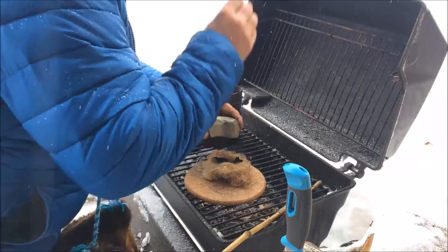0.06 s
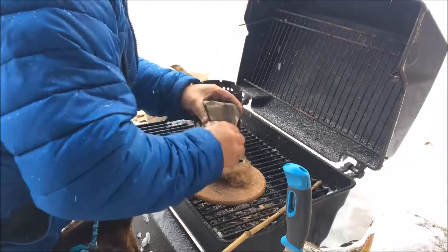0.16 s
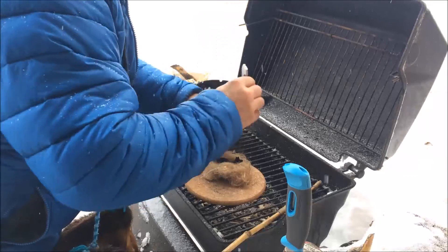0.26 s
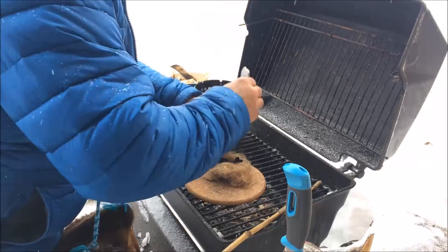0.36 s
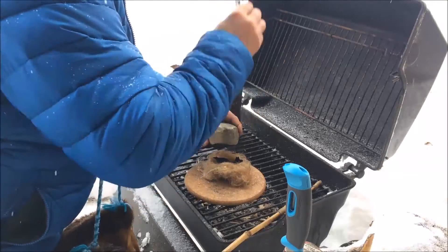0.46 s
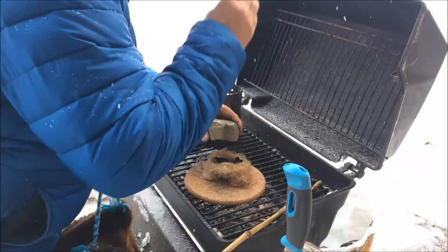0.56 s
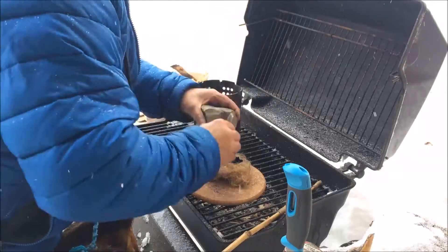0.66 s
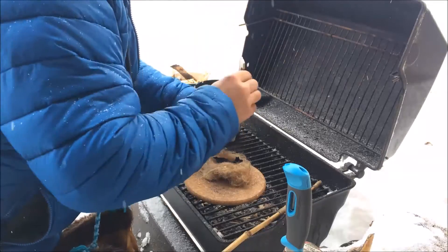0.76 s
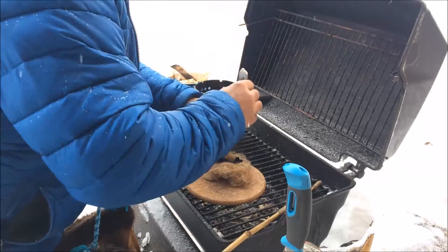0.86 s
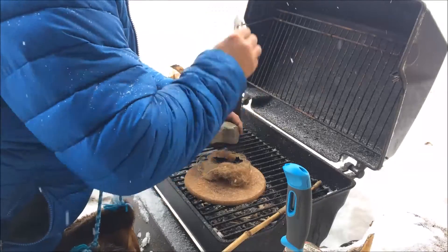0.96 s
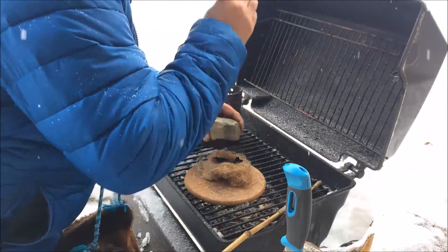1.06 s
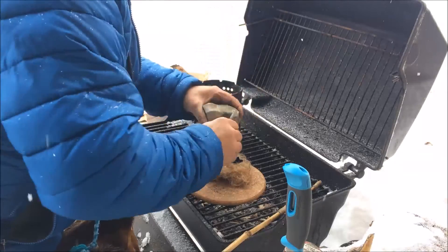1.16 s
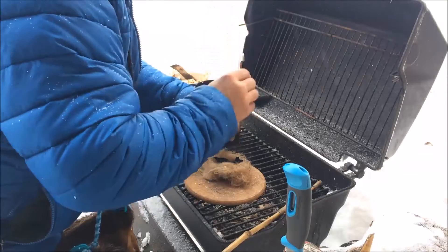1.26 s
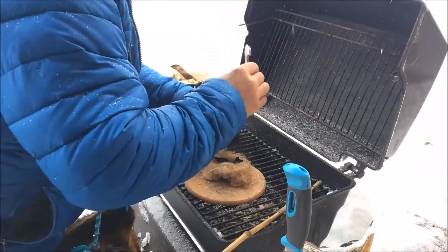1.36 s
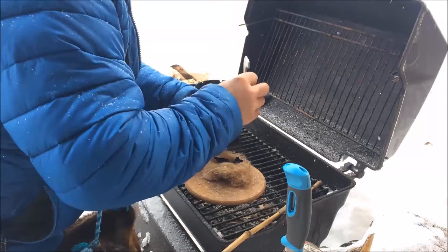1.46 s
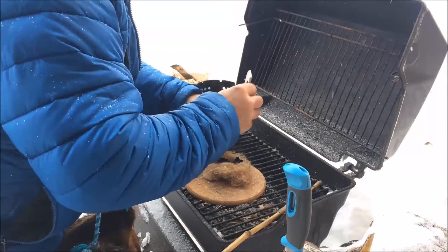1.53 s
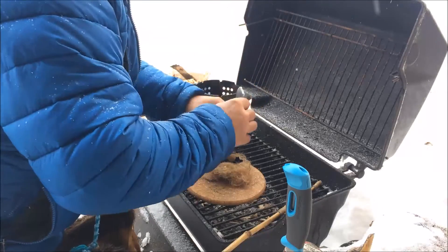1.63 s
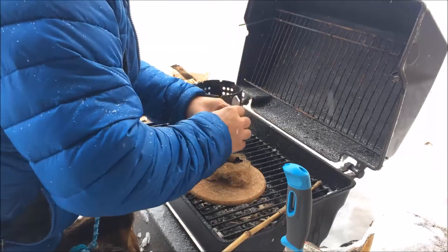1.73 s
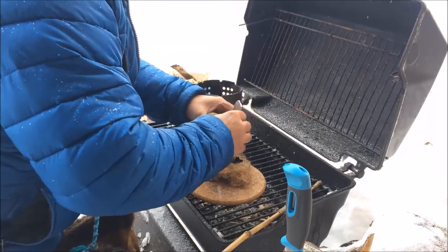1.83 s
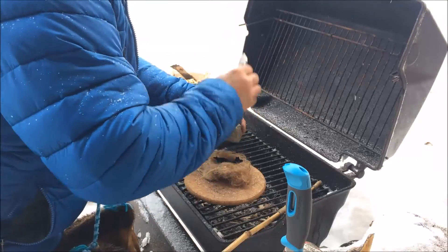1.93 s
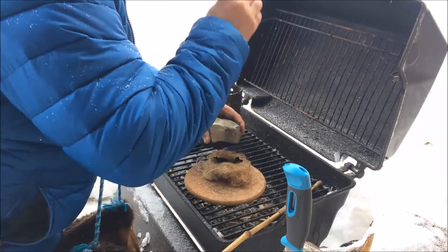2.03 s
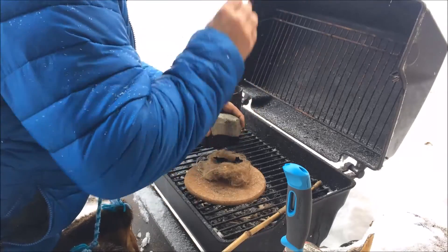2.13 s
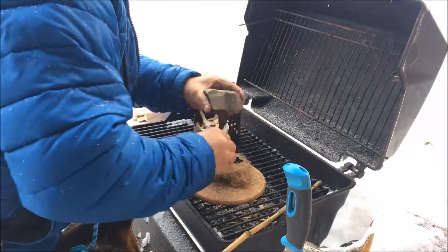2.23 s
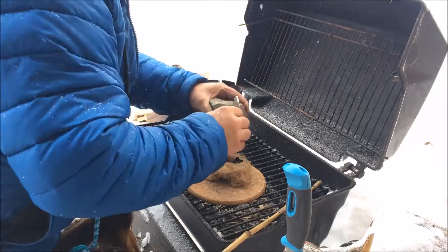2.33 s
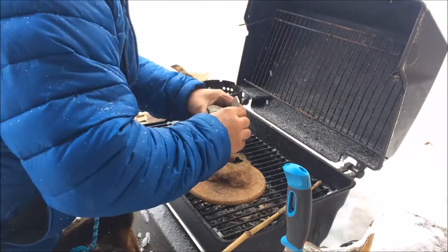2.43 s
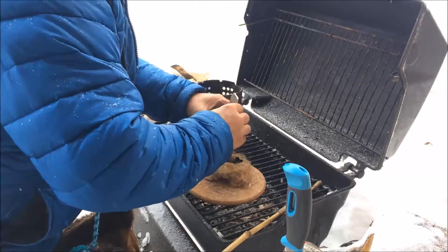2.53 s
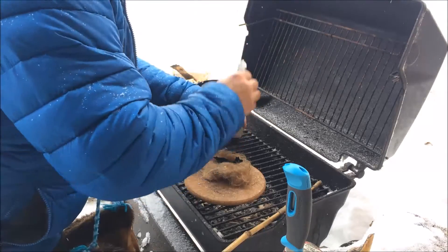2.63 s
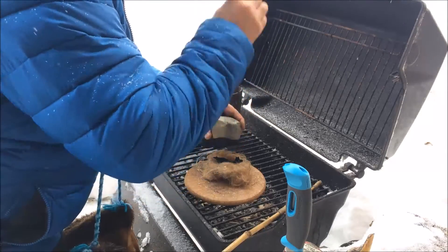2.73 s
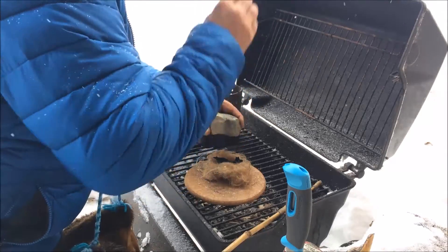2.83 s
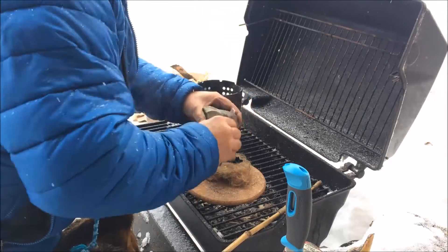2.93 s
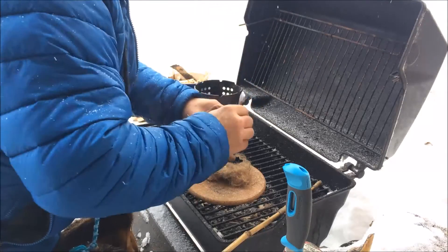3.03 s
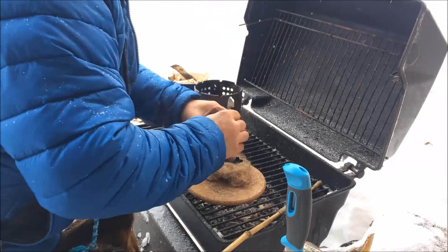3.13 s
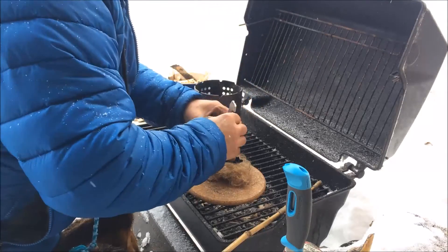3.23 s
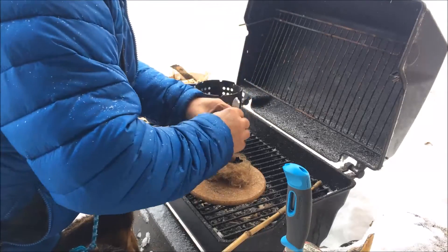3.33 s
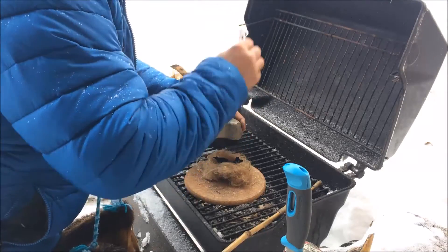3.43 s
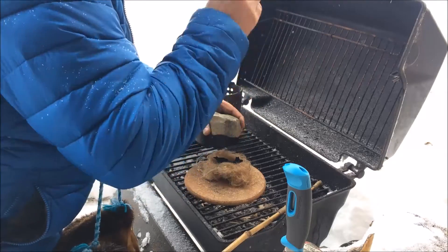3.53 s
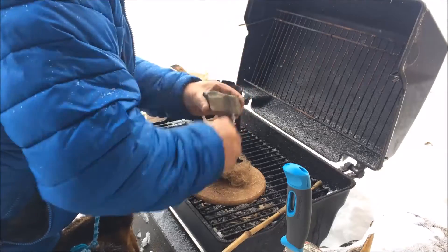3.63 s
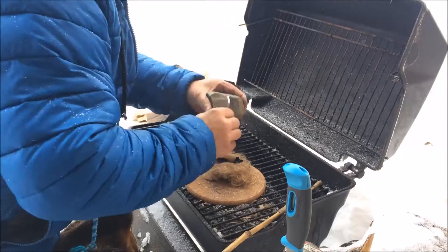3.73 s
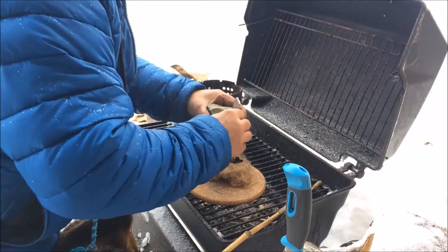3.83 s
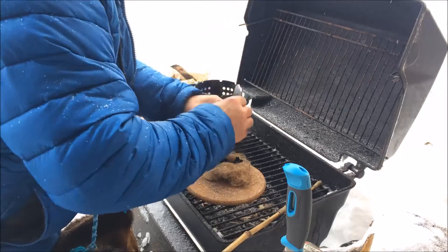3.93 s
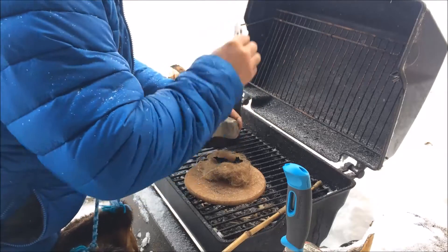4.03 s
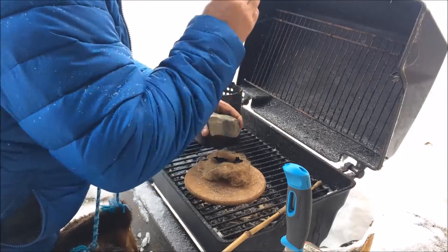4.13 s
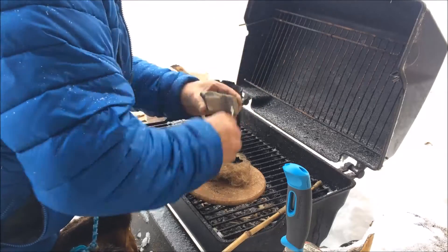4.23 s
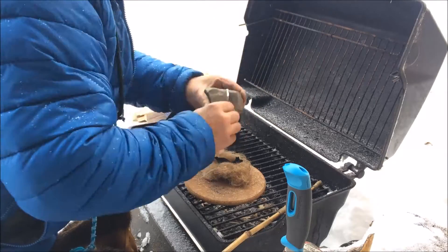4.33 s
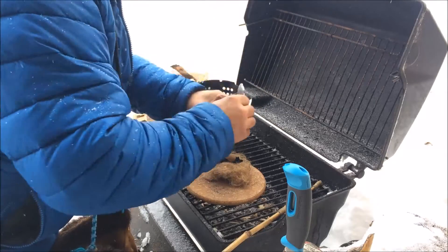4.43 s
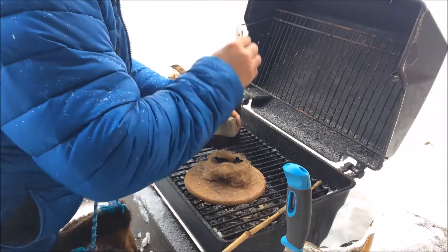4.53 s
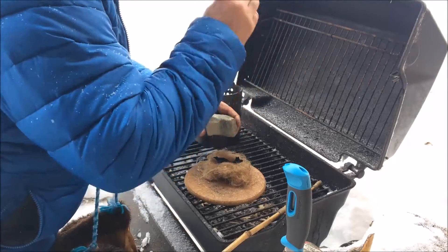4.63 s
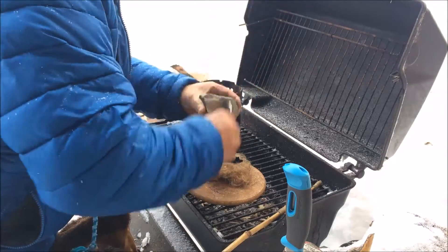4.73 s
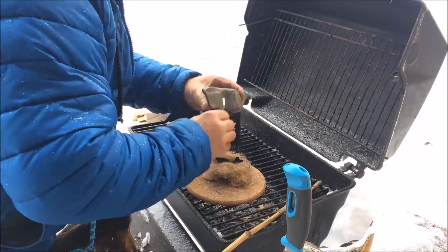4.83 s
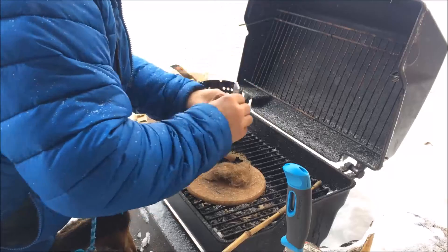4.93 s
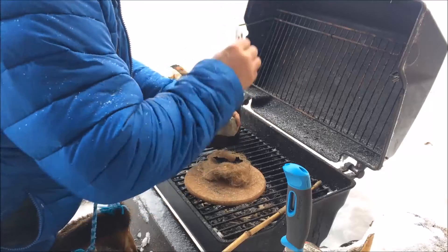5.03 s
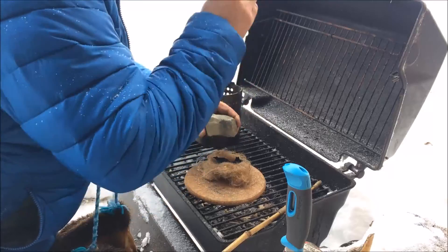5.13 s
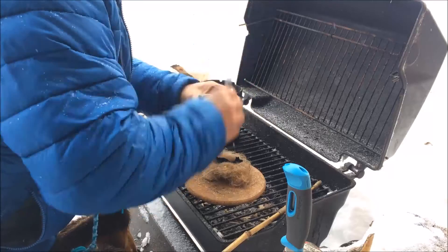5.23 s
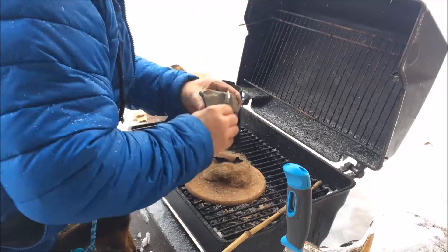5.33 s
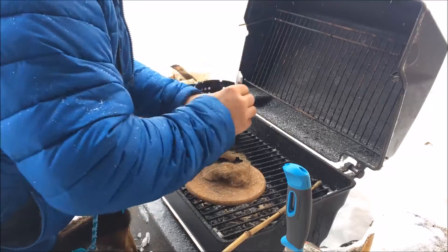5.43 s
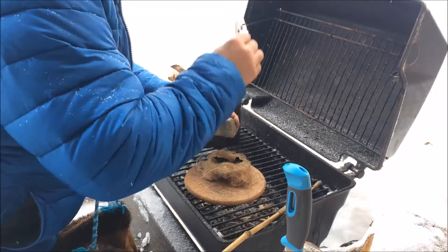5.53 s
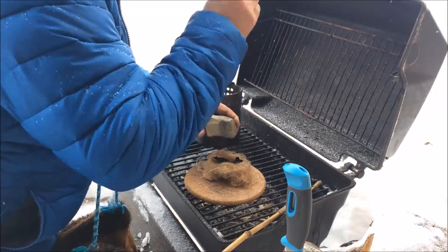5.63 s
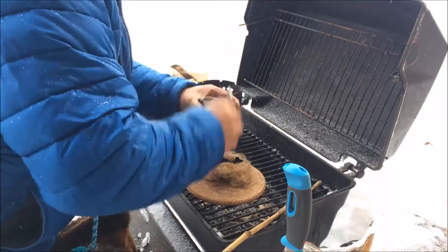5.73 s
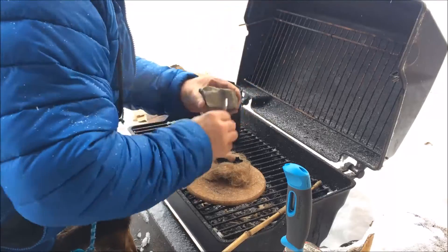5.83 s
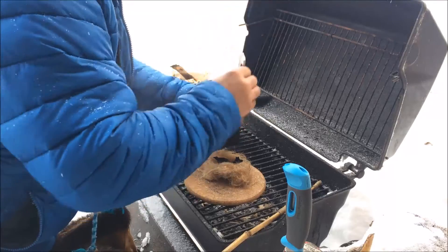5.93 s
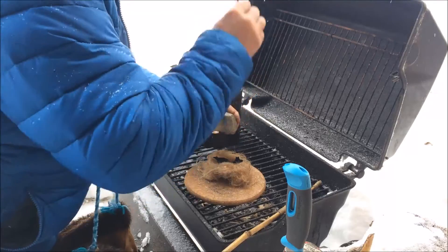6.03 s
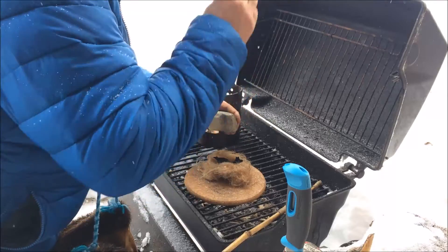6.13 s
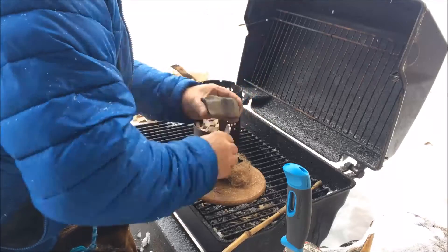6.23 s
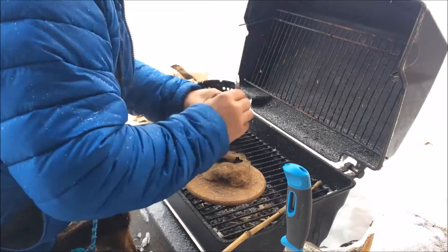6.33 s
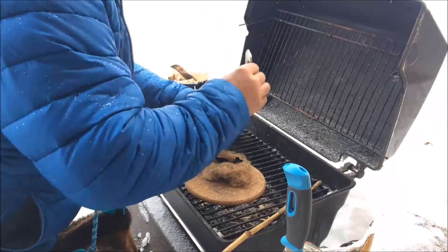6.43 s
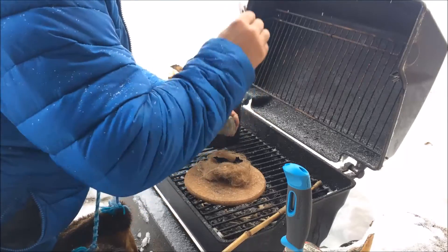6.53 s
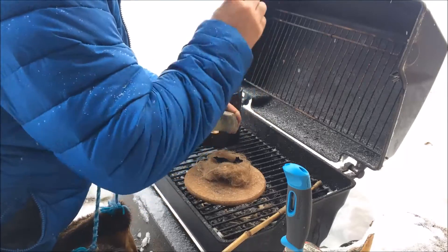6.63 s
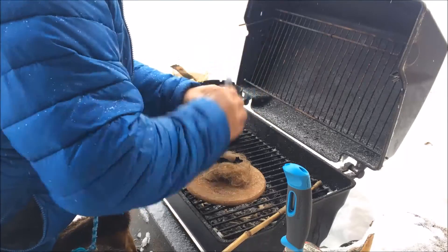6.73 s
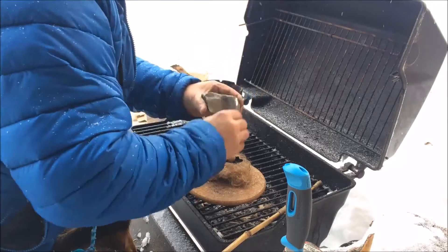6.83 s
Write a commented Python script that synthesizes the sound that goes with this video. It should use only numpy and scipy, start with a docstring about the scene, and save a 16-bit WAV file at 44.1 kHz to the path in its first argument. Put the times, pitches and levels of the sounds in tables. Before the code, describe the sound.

Sharp, scraping metallic clinks of steel struck repeatedly on flint, with soft sleeve swishes and a faint steady outdoor hum.

```python
"""Sharp, gritty clinks, about two a second: a steel striker swung against a hand-held flint.
Each blow cracks the stone, scrapes off chips and rings the gripped steel. An open grill adds its
hollow and lid echoes, the snowy yard a short tail. A padded sleeve swishes with the arm, the hands
bump the grill, and far engines hum over the still air."""
import sys
import numpy as np
from scipy import signal
from scipy.fft import rfft, irfft, next_fast_len
from scipy.io import wavfile
from scipy.ndimage import uniform_filter1d, minimum_filter1d, map_coordinates

SR = 44100
rng = np.random.default_rng(int(sys.argv[2]) if len(sys.argv) > 2 else 0)


def to_wav(s):
    """Save 16-bit WAV."""
    ch = np.atleast_2d(s).T  # columns
    pcm = np.round(np.clip(ch, -1, 1) * 32767)  # PCM
    wavfile.write(sys.argv[1], SR, pcm.astype(np.int16))


N = 302967
T = np.arange(SR // 3) / SR  # time within one blow

# steel meets flint: (time [s], strength [dB], relative thud level [dB], relative levels of bending
# modes 1, 2 and 3 [dB], pitch of mode 1 in this grip [Hz], scrape time constant [s])
STRIKES = [(0.237, -26.5, -33, 4.5, -7.5, 3, 4400, 0.0049), (0.7497, -25.5, -30, 2, -5.5, -3, 4420, 0.0032),
           (1.2554, -25, -21.5, -1, -10.5, -6.5, 4310, 0.0064),
           (1.2893, -41.5, -21.5, 10, -7.5, 6, 4270, 0.0011),
           (1.838, -49, -14, -15, -21, -11.5, 4360, 0.00023), (1.9271, -63, 3, -3, -5, -15, 4414, 0.001),
           (2.3024, -24, -15.5, -5, -6, -4, 4430, 0.0047), (2.6653, -64, -10, 0, 9, 1, 4675, .002),
           (3.0049, -25.5, -23.5, -1.5, -1, 3.5, 4355, 0.0025),
           (3.3827, -38.5, -13, 3, -16.5, -25, 4290, 0.001),
           (3.748, -27, -15.5, 3.5, 0.5, -7.5, 4400, 0.0039),
           (4.3482, -24.5, -17.5, 4.5, -11, -9, 4490, 0.0031),
           (4.853, -23.5, -15.5, 5, -8, -24.5, 4390, 0.0038), (5.359, -24, -24.5, 1.5, -9, 5, 4550, 0.0021),
           (5.8592, -25.5, -38.5, 6.5, -6.5, -10, 4545, .0036),
           (6.323, -26.5, -40, 2.5, -5.5, 5, 4590, 0.0027), (6.8625, -28, -25, 9.5, -22, 1, 4500, 0.0025)]
# steel damped by fingers and stone, one list per bending mode: (pitch [Hz], relative level [dB], t60 [s])
GRIPPED_MODES = [
    [(4197, -2, .03), (4407, 5.5, .028), (4490, -1.5, .036)],
    [(7190, -2, .022), (7290, 0, .028)],
    [(10740, -2, .017), (10880, 1, .016), (10630, -2, .016), (11200, -6, .018)],
]
# the same modes once the steel swings clear: (pitch [Hz], relative level [dB], t60 [s])
FREE_MODES = [(4380, 0, .27), (7300, 0, .14), (10750, 0, .15)]
# tone curves of the stone's body, its snap and the flying chips: (frequency [Hz], relative level [dB])
THUD_EQ = [(30, -43), (130, -12.5), (240, 1.5), (345, -2), (420, -12), (570, 6.5), (700, -5.5),
           (1000, -15.5), (3000, -53)]
CRACK_EQ = [(60, -62), (300, -43), (600, -21), (740, -15), (950, -8), (1400, -4), (1800, -1), (2400, 0.5),
            (3100, -7.5), (4200, 0), (7000, -23.5), (16000, -38)]
GRIT_EQ = [(200, -62), (800, -40.5), (3000, -10), (5400, 7), (7800, 3.5), (9300, -5), (11500, 1.5),
           (13200, -13), (14700, -4), (15300, -6.5), (16000, -22.5)]
# resonances of the grill's hollow: (pitch [Hz], relative level [dB])
HOLLOW_MODES = [(830, -4.5), (1050, 0), (1195, 0), (1336, -3), (1475, -3), (1735, 1.5), (1923, -6),
                (2085, -1), (2340, 3), (2527, -2.5)]
# slaps off lid and grate: (delay [s], gain [ratio])
LID_ECHOES = [(.0007, 0.34), (.0023, 0.22), (.0037, 0.51), (.0052, 0.19), (.0069, .24), (.0093, 0.19)]
# the yard's reverb time: (frequency [Hz], t60 [s])
YARD_DECAY = [(150, 0.24), (1500, 0.15), (4500, 0.13), (8000, 0.12), (15000, 0.15)]
# hands knock on the grill: (time [s], pitch [Hz], level [dB], t60 [s])
HAND_BUMPS = [(1.648, 153, -40.5, 0.114), (1.675, 149, -44, 0.087), (3.005, 83.5, -41, 0.22)]
# lift, downstroke, follow-through: (time from the blow [s], relative level [dB], half-length [s])
ARM_SWING = [(-.148, -61.5, 0.044), (-.015, -59, 0.058), (0.109, -68.5, .12)]
# the arms shift: (time [s], relative level [dB], half-length [s])
ARM_SHIFTS = [(1.637, -61.5, .013), (1.693, -68.5, .06), (2.728, -66.5, 0.088), (6.017, -66.5, .1),
              (6.52, -65.5, .08)]
# tone curves of rubbing nylon and outdoor air: (frequency [Hz], relative level [dB])
NYLON_EQ = [(400, -23), (800, -6.5), (1400, -5.5), (2300, -8.5), (3500, -10.5), (5000, -13), (7500, -14.5),
            (10000, -16.5), (14500, -17.5), (15500, -25.5)]
AIR_EQ = [(20, -26), (45, -12.5), (70, -10.5), (115, -6), (160, -8), (230, -14), (400, -16.5), (560, -13.5),
          (850, -14.5), (1150, -17), (1600, -27), (2300, -41), (6000, -52), (15500, -53)]
# an engine easing off, a deeper traffic hum, a faint far tone: (time [s], pitch [Hz], level [dB])
ENGINE = [(0, 180, -60), (.75, 190.3, -60.5), (1.25, 185.7, -61.5), (2.3, 194.5, -58.5),
          (3.4, 175.2, -61.5), (4.2, 178, -62.5), (4.8, 169, -60.5), (5.8, 157.2, -57.5),
          (6.87, 163.7, -60.5)]
TRAFFIC = [(0, 74, -82.5), (2, 73.2, -67), (3, 79.86, -65), (3.5, 82, -75), (6.87, 75.1, -72.5)]
WHINE = [(0, 577.5, -65.5), (1.2, 568, -73), (1.6, 577, -90)]

FULL_BLOW_DB, FULL_SCRAPE_S, AVERAGE_GRIP_HZ = -24, .0024, 4407  # an ordinary strike


def strikes(thud_trim_db=24, crack_db=32, grit_db=31.5, steel_trim_db=30, graze_db=-21):
    """The stone thuds and cracks, the scrape spits grit, the steel rings in three bending modes."""
    out = np.zeros(N)
    for s, strength_db, thud_db, *modes_db, grip_hz, scrape_s in STRIKES:
        drag = np.log2(scrape_s / FULL_SCRAPE_S)  # scrape length in doublings
        # a longer scrape carries the steel out from behind the hand, into the yard
        space = surroundings(yard_db=-5.5 + 4 * drag)
        blow = through(contact(scrape_s, scrape_db=-11), space)
        blow = soften(blow, strength_db, octave_db=5.5, dullest_hz=1705)
        scrape = through(contact(scrape_s, scrape_db=4.5), space)
        scrape = soften(scrape, strength_db, octave_db=13.5, dullest_hz=5050)
        grit = amp(grit_db + 8 * min(drag, 0)) * colour(scrape, GRIT_EQ)  # short scrapes tear off less
        thud = amp(thud_db + thud_trim_db) * colour(blow, THUD_EQ)
        crack = amp(crack_db) * colour(blow, CRACK_EQ)
        steel = amp(steel_trim_db) * steel_ring(scrape, space, strength_db, modes_db, grip_hz, drag)
        add(out, s, -amp(strength_db) * (grit + thud + crack + steel))
        add(out, s - .0017, amp(strength_db + graze_db) * grit)  # a graze just before the edge bites
    return out


def contact(scrape_s, scrape_db, spiky_db=4):
    """One sharp impact, then the flint edge tears tiny chips from the sliding steel."""
    chips = rng.standard_normal(len(T)) * amp(spiky_db * rng.standard_normal(len(T)))
    force = amp(scrape_db) * unit_energy(chips * np.exp(-T / scrape_s))
    force[0] += 1
    return force


def soften(x, strength_db, octave_db, dullest_hz, firm_hz=16000):
    """Lighter touches stay in contact longer and sound duller."""
    corner_hz = firm_hz * 2 ** ((strength_db - FULL_BLOW_DB) / octave_db)
    return signal.lfilter(*signal.butter(2, np.clip(corner_hz, dullest_hz, SR * 4 / 9), fs=SR), x)


def steel_ring(scrape, space, strength_db, modes_db, grip_hz, drag):
    """Each bending mode gives a choked clink on the stone and a faint, longer ring swinging clear."""
    free_db = -26 - .33 * (strength_db - FULL_BLOW_DB)  # the grip tightens with the strength
    damping = 2 ** (.22 * max(drag, 0))  # a long drag chokes the clink sooner
    tunings = (grip_hz / AVERAGE_GRIP_HZ, 1, 1)  # the grip retunes only the lowest mode
    out = np.zeros(len(T))
    for level_db, tuning, gripped, free in zip(modes_db, tunings, GRIPPED_MODES, FREE_MODES):
        choked = sum(ring(hz * tuning, db, t60 / damping) for hz, db, t60 in gripped)
        clink = unit_energy(through(scrape, choked))
        hz, db, t60 = free
        clear = afterring(hz * np.sqrt(tuning), t60)  # half the retuning off the stone
        linger = amp(free_db + db) * unit_energy(through(space, clear))
        out += amp(level_db) * (clink + linger)
    return out


def ring(hz, db, t60, scatter_db=2, detune=.0015):
    """One decaying mode, a little different at every touch."""
    gain = amp(db + rng.normal(0, scatter_db))
    pitch_hz = hz * (1 + rng.normal(0, detune))
    return gain * fade(t60) * np.sin(2 * np.pi * pitch_hz * T)


def afterring(hz, t60, roam_hz=125, roam_s=.0034):
    """A mode whose pitch roams as the fingers shift on the moving steel."""
    roam = unit_rms(uniform_filter1d(rng.standard_normal(len(T)), round(roam_s * SR)))
    return fade(t60) * np.sin(2 * np.pi * np.cumsum(hz + roam_hz * roam) / SR)


def surroundings(yard_db, hollow_db=-13, hollow_t60=.085, build_s=.0027):
    """Direct sound, lid echoes that shift with the hands, the grill's hollow and a short diffuse tail."""
    hz, t, bands = signal.stft(rng.standard_normal(len(T)), SR, nperseg=128)
    decay = np.exp(-np.log(1000) * t / along(YARD_DECAY, hz)[:, None])
    tail = signal.istft(bands * decay, SR)[1][:len(T)]
    hollow = sum(ring(pitch, db, hollow_t60) for pitch, db in HOLLOW_MODES)
    response = amp(yard_db) * unit_energy(tail * (1 - np.exp(-T / build_s)))
    response += amp(hollow_db) * unit_energy(hollow)
    response[0] += 1
    for delay_s, gain in LID_ECHOES:
        response[round(abs(delay_s * (1 + rng.normal(0, .02))) * SR)] += gain
    return response


def hand_bumps(attack_s=.0015):
    """Each soft knock on the grill wakes only one low mode."""
    out = np.zeros(N)
    for s, hz, db, t60 in HAND_BUMPS:
        add(out, s, ring(hz, db, t60) * (1 - np.exp(-T / attack_s)))
    return out


def sleeve(swung_above_db=-33, trim_db=1.5, grain_db=1, flutter_db=1.5):
    """Nylon rubs on nylon in fine catches as the arm rises, pauses at the top and falls."""
    t = np.arange(N) / SR
    swings = [(s + offset_s, db, half_s) for s, strength_db, *_ in STRIKES
              if strength_db > swung_above_db for offset_s, db, half_s in ARM_SWING]
    power = amp(-70) ** 2  # faint rustle between swings
    for s, db, half_s in swings + ARM_SHIFTS:
        power += amp(db) ** 2 * np.exp(-((t - s) / half_s) ** 2)
    envelope = np.sqrt(power) * amp(trim_db + flutter_db * wobble(6))
    return envelope * unit_rms(noise(NYLON_EQ) * amp(grain_db * wobble(350)))


def hum(rows, waver_hz, flutter_db, overtone_db):
    """A far machine tone and its octave, wavering on their way through the air."""
    times, pitches, levels = np.transpose(rows)
    t = np.arange(N) / SR
    hz = np.interp(t, times, pitches) + waver_hz * wobble(14)
    db = np.interp(t, times, levels) + flutter_db * wobble(24)
    phase = 2 * np.pi * np.cumsum(hz) / SR
    return amp(db) * np.sqrt(2) * (np.sin(phase) + amp(overtone_db) * np.sin(2 * phase))


def outdoor_bed(air_db=-58.5):
    """Far engines over a steady rush of air."""
    air = amp(air_db + .5 * wobble(6.8)) * noise(AIR_EQ)
    engine = hum(ENGINE, waver_hz=4.5, flutter_db=2.04, overtone_db=-15)
    traffic = hum(TRAFFIC, waver_hz=2.5, flutter_db=2, overtone_db=-10)
    whine = hum(WHINE, waver_hz=.6, flutter_db=3, overtone_db=-23)
    return air + engine + traffic + whine


def amp(db):
    """Decibels to gain."""
    return 10 ** (np.asarray(db) / 20)


def unit_rms(x):
    """Scale to rms 1."""
    return x / np.sqrt(np.mean(x ** 2) + 1e-20)


def unit_energy(x):
    """Scale to energy 1."""
    return x / (np.linalg.norm(x) + 1e-20)


def fade(t60):
    """Exponential decay over one blow."""
    return np.exp(-np.log(1000) * T / t60)


def along(points, hz):
    """Read a curve on a log frequency axis."""
    knots_hz, values = np.transpose(points)
    return np.interp(np.log(hz + 1), np.log(knots_hz), values)


def wobble(rate):
    """A smooth random curve, rate knots a second."""
    return map_coordinates(rng.standard_normal(int(N * rate / SR) + 4), [np.arange(N) * rate / SR])


def noise(eq):
    """Coloured noise of rms 1."""
    size = next_fast_len(N + 8192)
    gains = amp(along(eq, np.fft.rfftfreq(size, 1 / SR)))
    return unit_rms(irfft(rfft(rng.standard_normal(size)) * gains, size)[:N])


def colour(x, eq, size=2048):
    """Minimum-phase EQ that keeps the attack tight; the result has energy 1."""
    cepstrum = irfft(np.log(amp(along(eq, np.fft.rfftfreq(size, 1 / SR)))))
    cepstrum[1:size // 2] *= 2
    cepstrum[size // 2 + 1:] = 0
    click = unit_energy(irfft(np.exp(rfft(cepstrum))))
    return unit_energy(through(x, click))


def through(x, response):
    """Convolve within one blow."""
    return signal.fftconvolve(x, response)[:len(T)]


def add(track, s, x):
    """Mix x into the track at time s."""
    part = track[max(round(s * SR), 0):][:len(x)]
    part += x[:len(part)]


def limit(x, ceiling=.9, window=23):
    """A fast limiter ducks only the peaks that would pass the ceiling."""
    gain = ceiling / np.maximum(abs(x), ceiling)
    return x * uniform_filter1d(minimum_filter1d(gain, window), window)


def scene():
    """Strikes up front, handling and outdoor bed behind, in mono."""
    return (strikes() + hand_bumps() + sleeve() + outdoor_bed())[None]


def record(dry, low_cut_hz=30, high_cut_hz=15350):
    """The microphone limits the peaks, drops the deepest bass and cuts the very top steeply."""
    low_cut = signal.butter(2, low_cut_hz, "high", fs=SR, output="sos")
    high_cut = signal.ellip(10, .1, 100, high_cut_hz, fs=SR, output="sos")
    return signal.sosfilt(high_cut, signal.sosfilt(low_cut, limit(dry)))


dry = scene()
out = record(dry)
to_wav(out)
```